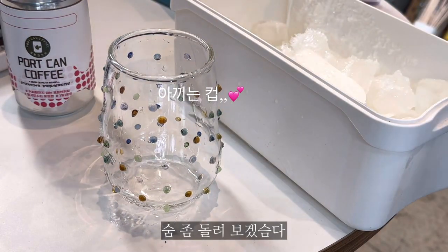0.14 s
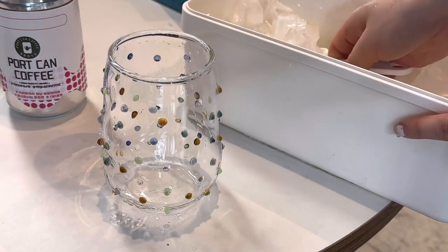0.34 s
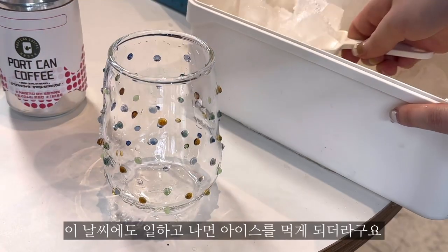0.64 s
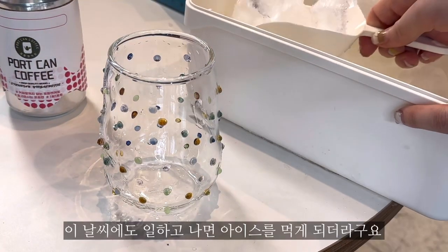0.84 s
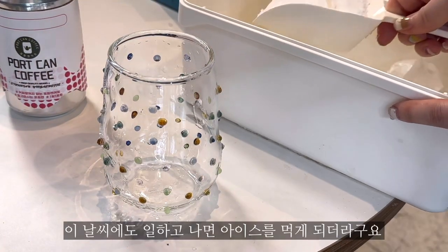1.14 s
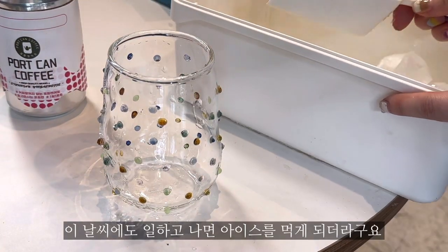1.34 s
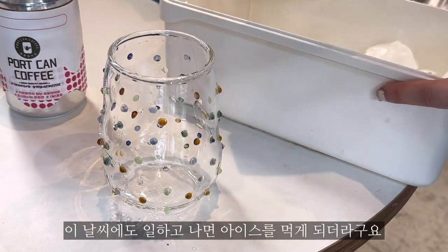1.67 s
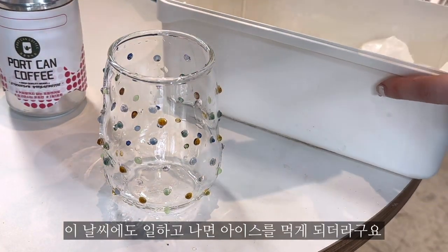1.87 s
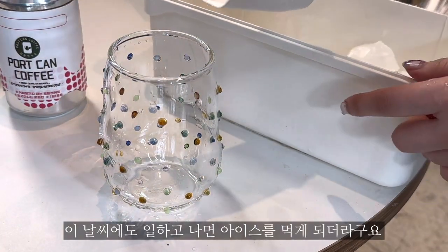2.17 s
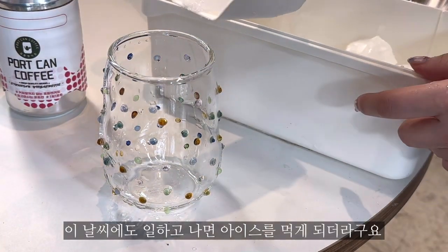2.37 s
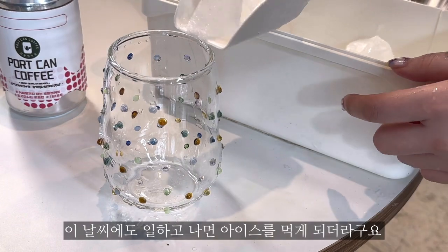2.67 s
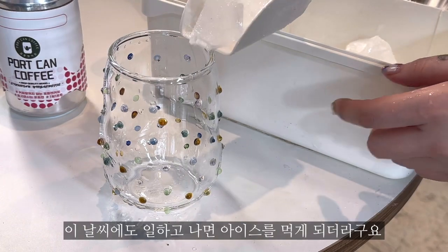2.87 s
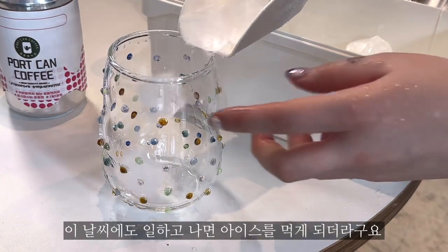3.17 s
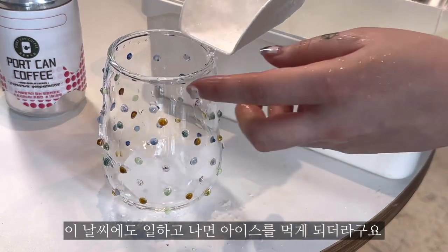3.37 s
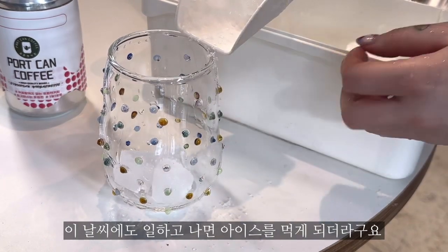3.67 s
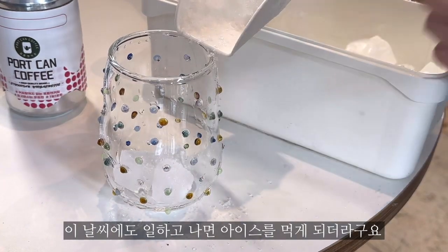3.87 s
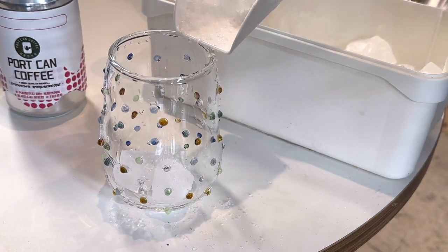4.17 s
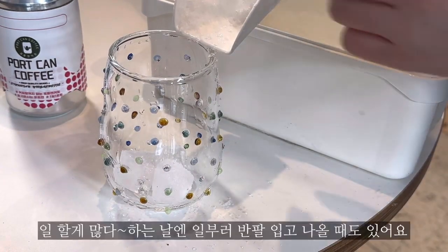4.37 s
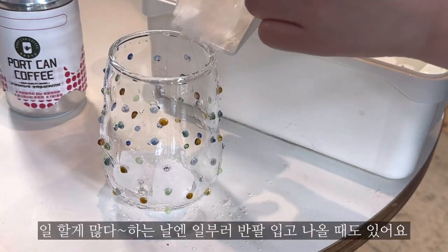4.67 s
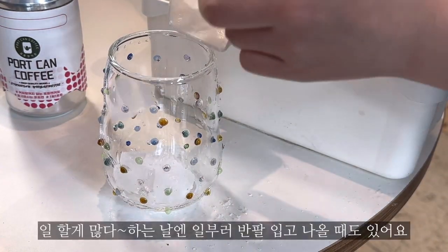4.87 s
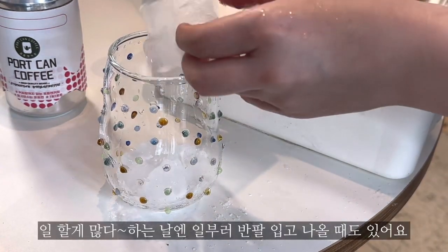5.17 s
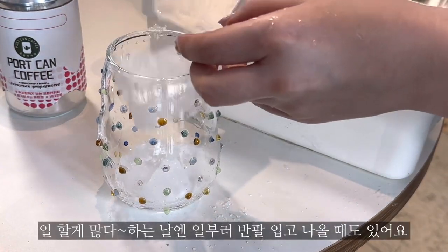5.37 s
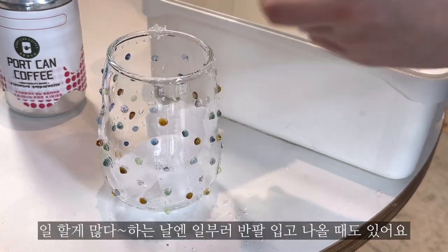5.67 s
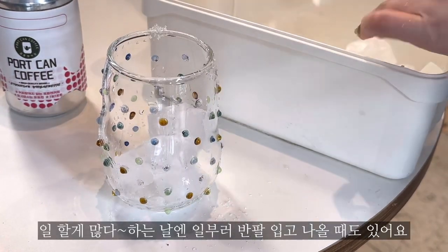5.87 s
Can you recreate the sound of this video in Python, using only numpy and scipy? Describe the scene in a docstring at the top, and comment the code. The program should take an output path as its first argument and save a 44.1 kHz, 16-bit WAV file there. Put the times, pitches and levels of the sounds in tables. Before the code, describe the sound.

In a small quiet room with a low rumble, a scoop digs through ice in a plastic box, crunching and knocking with hollow plastic clacks. After a near-silent pause, cubes slip with dry ticks and clatter brightly into a thin glass on a table. Another pause, then a second tipping clinks more, muffled slightly by ice already there. Close stereo microphones.

```python
"""Ice cubes are dug out of a plastic box with a plastic scoop and tipped, in two goes, into a thin glass tumbler.
Box, scoop, glass and table ring as sums of decaying modes; ice crunches and grinds as coloured noise and clicks.
The air in the glass sounds a short tone at each landing, and the cubes chatter on the wall as they pour.
Small quiet room: low rumble, steady hum, short diffuse reflections. Close pair of microphone ports."""
import sys
import numpy as np
from scipy import signal
from scipy.fft import rfft, irfft, next_fast_len
from scipy.io import wavfile
from scipy.ndimage import uniform_filter1d

SR = 44100
rng = np.random.default_rng(int(sys.argv[2]) if len(sys.argv) > 2 else 0)


def write(x):
    x = np.atleast_2d(x).T
    wavfile.write(sys.argv[1], SR, np.round(np.clip(x, -1, 1) * 32767).astype(np.int16))

N = 265041
TIME = np.arange(N) / SR
AGE = TIME[:SR // 4]   # time since a contact
ATTACK = SR // 50   # samples over which the level of a contact is counted

# Room rumble, shape of its spectrum: [f/Hz, density/dB]
RUMBLE_SPECTRUM = [(15, -38.5), (25, -20.5), (59, -5.5), (108, -20.5), (127, -19.5), (180, -20),
                   (242, -24.5), (344, -27), (439, -38.5), (936, -41), (1040, -33), (1190, -37),
                   (9840, -63.5), (16000, -63.5)]
# Steady hum of the room: [f/Hz, level/dB rms]
HUM_TONES = [(59.2, -67), (177.6, -73.5), (1077, -77)]
# Reverberation of the room: [f/Hz, t60/s]
REVERB_TIMES = [(100, 0.82), (700, 0.31), (3000, 0.19), (8000, 0.043), (16000, 0.12)]
# Phase by which the left port leads: [f/Hz, phase/rad]
LEFT_LEAD = [(100, 0), (350, -.2), (520, .45), (750, .15), (1100, -.15), (1600, 0), (2600, 0), (3900, .3),
             (5000, 0), (6600, .05), (7300, .9), (7900, 2.95), (8600, 3.05), (9250, 1.2), (10300, .7),
             (11300, 0), (12800, -.1), (15800, -2.2)]
# Left port minus right port: [f/Hz, level/dB]
LEFT_EXCESS = [(60, .5), (250, 1), (430, -2.5), (700, 5), (860, 1.5), (1030, 3), (1400, 0)]

# Ice knocking in the box: [t/s, strength/dB, sharpness/dB (0 ordinary, above a hard corner, below a dull bump)]
KNOCKS_IN_BOX = [(.05, -55, -4), (.252, -51, -5), (.332, -46, -4), (.352, -46, -3), (.387, -35, 1),
                 (.392, -29, 1), (.414, -36, -9), (.431, -27, -6), (.45, -38, -3), (.509, -41, 0),
                 (.585, -43, 0), (.616, -42, 0), (.663, -35, -7), (.682, -35, 6), (.72, -29, 0),
                 (.726, -31, -3), (.749, -28, -3), (.768, -26, 0), (.786, -30, 0), (.793, -28, 5),
                 (.831, -32, -4), (.856, -25, 4), (.862, -28, 0), (.881, -30, 2), (.895, -31, 0),
                 (.962, -23, 3), (.974, -26, -1), (.984, -22, -4), (1.015, -26, -2), (1.023, -29, 3),
                 (1.044, -27, 2), (1.055, -26, -1), (1.072, -27, 1), (1.109, -29, -1), (1.12, -31, -2),
                 (1.152, -29, 4), (1.185, -41, -4), (1.215, -39, 3), (1.265, -43, 2), (1.325, -43, -4),
                 (1.796, -51, 0), (2.011, -42, 2), (2.031, -37, -7), (2.045, -36, -9), (2.105, -52, -4),
                 (2.232, -58, 0), (2.472, -56, -2), (5.937, -55, 2)]
# Plastic walls of the box: [f/Hz, level/dB, t60/s]
BOX_WALL_MODES = [(108, -28.5, 0.33), (174, -20.5, 0.12), (295, -22, 0.13), (404, -4.5, 0.089),
                  (503, -2, 0.041), (675.6, -6, 0.08), (760, 5.5, 0.035), (832, -5, 0.025),
                  (897, 0.5, 0.05), (990, 7, 0.023), (1264, -4, 0.039), (1310, -9, 0.045)]
# How hard the cubes grind in the box, one curve per stroke: [t/s, level/dB]
DIGGING_STROKES = [
    [(0.25, -70), (0.316, -57), (0.442, -49.5), (0.54, -48.5), (0.728, -37), (0.888, -43), (0.962, -34),
     (1.13, -41), (1.306, -53), (1.372, -63), (1.644, -60.5), (1.83, -62)],
    [(1.95, -69), (2.02, -49.5), (2.186, -73.5), (2.284, -62), (2.44, -68.5)],
]
# How hard the cubes grind while pouring, one curve per go: [t/s, level/dB]
POURING_STROKES = [
    [(2.88, -60.5), (2.958, -55), (3.194, -41), (3.254, -45), (3.344, -53), (3.442, -49.5), (3.506, -47.5),
     (3.652, -71), (3.72, -64)],
    [(4.6, -78), (4.658, -71.5), (4.79, -49.5), (4.886, -45), (5.102, -51.5), (5.298, -65.5), (5.426, -50),
     (5.47, -48.5), (5.642, -57), (5.72, -67.5)],
]
# The box rocks and bumps on the table: [t/s, level/dB]
BUMPS_ON_TABLE = [(.806, -35), (0.986, -41), (1.16, -41.5), (2.017, -49.5)]
# Box and table in a bump: [f/Hz, level/dB, t60/s]
BOX_BUMP_MODES = [(108, 7, 0.13), (152.3, -1, .08)]
# Ice slipping in the scoop: [t/s, strength/dB, sharpness/dB]
TICKS_IN_SCOOP = [(2.781, -44.5, -5.5), (2.833, -57.5, -12), (2.89, -44, -7.5), (2.906, -55, 2),
                  (2.936, -55, 2.5), (3.025, -31, -8), (3.043, -45.5, 1.5), (3.056, -48, -5),
                  (3.071, -35, -1.5), (3.084, -37, 4.5), (3.096, -37.5, 4), (3.657, -39.5, -10),
                  (3.707, -58, -30), (4.099, -52.5, -8.5), (4.594, -71, 12.5), (4.628, -43.5, -2),
                  (4.645, -40, 1.5), (4.662, -48.5, -2.5), (4.722, -52.5, 4), (5.014, -49, 11),
                  (5.066, -46.5, 5), (5.111, -54, 0.5), (5.19, -55.5, 6), (5.215, -70, 4)]
# Scoop over the mouth of the tumbler: [f/Hz, level/dB, t60/s]
SCOOP_BODY_MODES = [(352, -23.5, .03), (608, 6, 0.13), (850, 10, 0.016), (970, -1, 0.072),
                    (1144, 12.5, 0.035)]

# Cubes striking the tumbler: [t/s, strength/dB, landing/dB (weight passed to the bottom),
# ring/dB (how freely the wall swings), spot/1 (below 0 favours the second wall mode, above 0 the first)]
STRIKES_ON_GLASS = [(3.176, -37, -19.5, -10.5, 0.33), (3.206, -33, 6.5, -11, 0.29),
                    (3.251, -32, -3, -13, -0.0096), (3.267, -27.5, -0.5, -11.5, 0.31),
                    (3.272, -32.5, -4, -11.5, 0.45), (3.286, -45.5, 1.5, -12.5, -0.46),
                    (3.345, -44, 4, -18, 0.48), (3.37, -36, -13, -15, -.2), (3.38, -49.5, 6, -1, -0.25),
                    (3.392, -31, 5.5, -10, 0.49), (3.399, -37.5, 5, -18, 0.95), (3.445, -50, 2, 9, 0.022),
                    (4.78, -50.5, 5, 1.5, 0.53), (4.815, -42, -2.5, -9, -0.78),
                    (4.845, -43, -9, 6.5, -0.0022), (4.861, -41.5, -13, 11, 0.03),
                    (4.896, -39, -17, -10, -0.55), (4.911, -33, -20, 5, 0.34),
                    (4.946, -33.5, -13, -12.5, -0.85), (4.966, -31, 1.5, -10, 0),
                    (4.986, -36.5, -2, -24, -0.35), (5.236, -45, 13, -2, 0.7), (5.266, -41.5, -5, -8.5, 0),
                    (5.284, -39, -14, -0.5, -0.096), (5.294, -35.5, -21, -5.5, -0.42),
                    (5.31, -50, -1.5, -16.5, 0.76), (5.324, -35, -11.5, -7, .6),
                    (5.328, -36.5, 4.5, -14.5, -0.13), (5.403, -53, -34, 2, 0.27),
                    (5.43, -46, -6.5, -2, 0.25), (5.451, -39.5, -15, 1.5, 0.48),
                    (5.454, -28.5, 4, -3, 0.15), (5.466, -38.5, -6, -5.5, -0.43),
                    (5.478, -33.5, -1.5, -12, 0.017), (5.506, -38, -4.5, 3, -0.11),
                    (5.562, -42.5, -9, -4.5, -0.45)]
# A landed cube rocks on the bottom, first touch: [t/s, strength/dB]
ROCKING_CUBES = [(3.474, -52.5), (3.536, -51.5), (4.764, -62), (5.04, -55.5), (5.124, -57.5), (5.6, -71)]
# Tumbler wall, first mode, split by the uneven glass: [f/Hz, level/dB, t60/s]
FIRST_WALL_MODES = [(1621, 0, .155), (1640, -11, .09)]
# Tumbler wall, second mode, likewise split: [f/Hz, level/dB, t60/s]
SECOND_WALL_MODES = [(3908, -10, .14), (4000, 0, .14)]
# Tumbler wall, upper modes: [f/Hz, level/dB, t60/s]
UPPER_WALL_MODES = [(2190, -10, .05), (2660, -9, .07), (5665, -9, .1), (5872, -5, .12), (6953, 0, .09),
                    (6999, 0, .09), (7395, 0, .06), (7612, -2, .045)]
# Highest modes, the shimmer of the glass: [f/Hz, level/dB, t60/s]
GLASS_SHIMMER_MODES = [(8950, -3, .04), (9080, 0, .05), (9870, -6, .04), (10138, -1, .075),
                       (10680, -4, .075), (12080, -4, .04), (12970, -6, .055), (13630, -4, .055),
                       (14120, -6, .055), (14720, -5, .045), (15520, -7, .045)]
# Glass bottom on the table top: [f/Hz, level/dB, t60/s]
GLASS_ON_TABLE_MODES = [(108.4, -24, 0.54), (191, -16, 0.065), (329, -8, 0.065), (426, -12, 0.022),
                        (767, 0, 0.031), (910, -19.5, 0.0049), (977.5, -1, .045), (1170, -6.5, 0.012),
                        (1360, 5, 0.01)]
# Air in the tumbler, lower while ice and scoop cover the mouth: [t/s, f/Hz]
AIR_RESONANCE = [(3.206, 579.5), (3.345, 627), (3.4, 629), (4.85, 617), (4.97, 657), (5.236, 587),
                 (5.327, 538), (5.454, 650.4), (5.6, 667)]
# Start and end of the ice piling up in the glass: [t/s]
FILLING_SPAN = (3.4, 4.9)

# Colour of the clack of ice and plastic: [f/Hz, density/dB]
CLACK_SPECTRUM = [(300, -15), (900, -10), (1600, 6.5), (2300, 0), (3400, -5), (5000, -20), (9000, -41.5)]
# Colour of the crack of ice: [f/Hz, density/dB]
CRACK_SPECTRUM = [(1500, -36.5), (3500, 1.5), (5000, 3), (7500, 3.5), (10300, 6), (11600, -1.5),
                  (15500, -4.5)]
# Colour of ice crunching on glass: [f/Hz, density/dB]
ICE_ON_GLASS_SPECTRUM = [(200, 6.5), (900, 0.5), (2200, 10), (3200, -0.5), (5000, -1.5), (7500, 4),
                         (10500, -9), (11500, -8), (15500, -15)]
# Colour of ice rubbing along plastic: [f/Hz, density/dB]
RUB_SPECTRUM = [(100, -31), (250, -7.5), (450, -9), (850, -1), (1400, -15), (2400, -16.5), (4000, -26),
                (8000, -31)]

BODY_YIELDS = .25   # share of the sharpness that is lost to the body
CLACK_FOLLOWS = 0.1   # share of the sharpness that reaches the clack
# knocks stirred up by digging, levels relative to that of the grinding
SMALL_KNOCKS_PER_S, SMALL_KNOCK_DB, SMALL_KNOCK_SPREAD_DB = 35, -6.5, 6.5
FITS_PER_S, FITS_DB = 33, 1   # cubes catch and slip, so the grinding comes in fits
ROCK_PERIOD_S, ROCK_LOSS_DB = 0.042, 7.5   # from touch to touch
ROCK_LANDING_DB, ROCK_RING_DB = 9, -8.5
SPOT_DB = 15   # how far the spot tips the balance of the two wall modes
# away from a hard landing the air follows only this share of the change in the thud
HARD_LANDING_DB, AIR_FOLLOWS = -24.5, 0.71
FILL_DAMPS_DB, FILL_CUSHIONS_DB = 5.5, 1.5   # lying ice stills the high modes and softens the thud
CHOKE_DB, CHOKE_S = 5.5, .004   # a new contact takes this much off earlier rings, within this time
GLANCE_SPARKLES = 0.23   # share of the landing lost to the high modes: a glancing cube sparkles most


def from_db(db):
    """Amplitude ratio of a level."""
    return 10 ** (np.asarray(db) / 20)


def rms_one(x):
    """Scale to unit rms."""
    return x / np.sqrt(np.mean(x ** 2) + 1e-20)


def at_hz(points, hz):
    """A short table read on a log-frequency axis."""
    knots, values = np.transpose(points)
    return np.interp(np.log(np.maximum(hz, 1)), np.log(knots), values)


def coloured(x, spectrum, tint_db=0):
    """Causal (minimum-phase) filter with the given spectrum; tint gives each row broad humps of its own."""
    size = 2 * next_fast_len(x.shape[-1] // 2 + SR // 20)
    hz = np.fft.rfftfreq(size, 1 / SR)
    db = at_hz(spectrum, hz)
    if tint_db:
        knots = np.geomspace(700, 16000, 20)
        humps = rng.uniform(-1, 1, (len(x), len(knots)))
        db = db + tint_db * np.array([np.interp(hz, knots, row) for row in humps])
    # folding the cepstrum onto positive time makes the phase minimal
    cepstrum = irfft(np.log(from_db(db)))
    cepstrum[..., 1:size // 2] *= 2
    cepstrum[..., size // 2 + 1:] = 0
    response = np.exp(rfft(cepstrum))
    return irfft(rfft(x, size) * response)[..., :x.shape[-1]]


def add(track, times, levels_db, sounds):
    """Lay one sound per contact into the track, each at its own attack level."""
    for s, db, sound in zip(times, levels_db, sounds):
        start = max(int(s * SR), 0)
        gain = from_db(db) / np.sqrt(np.mean(sound[:ATTACK] ** 2) + 1e-20)
        part = track[start:start + len(sound)]
        part += gain * sound[:len(part)]


def ringing(modes, count, scatter_db, detune):
    """Each contact finds other mode strengths and phases; the load of ice shifts and damps the modes."""
    age = AGE.astype(np.float32)
    out = np.zeros((count, len(age)), np.float32)
    for hz, db, t60 in modes:
        draws = rng.uniform(-1, 1, (count, 4)).astype(np.float32)
        strength, phase, shift, load = draws.T[:, :, None]
        wave = np.sin(np.float32(2 * np.pi * hz) * (1 + detune * shift) * age + np.pi * phase)
        rate = np.float32(np.log(1000) / t60) * np.exp(0.23 * load)
        decay = np.exp(-np.minimum(rate * age, 20))
        rise = 1 - np.exp(-age / np.float32(0.00009 + 0.19 / hz))   # builds up while the contact lasts
        out += from_db(db + scatter_db * strength) * wave * decay * rise
    return out


def crunch(spectrum, count, snap_s, crumble_s, crumble_db):
    """A contact crushes the ice surface: a sharp snap, then a few crumbs; every cube has its own colour."""
    age = AGE[:SR // 12]
    snap, crumbs, sizes = rng.standard_normal((count, 3, len(age))).transpose(1, 0, 2)
    snapping = snap * np.exp(-age / snap_s)
    crumbling = from_db(crumble_db) * crumbs * sizes ** 2 * np.exp(-age / crumble_s)
    onset = 1 - np.exp(-age / .0005)
    return coloured((snapping + crumbling) * onset, spectrum, tint_db=5)


def background(side_db):
    """Low rumble of the room, nearly alike at both ports, with a faint steady hum."""
    mid, side = rms_one(coloured(rng.standard_normal((2, N)), RUMBLE_SPECTRUM))
    hum = np.zeros(N)
    for hz, db in HUM_TONES:
        hum += np.sqrt(2) * from_db(db) * np.sin(2 * np.pi * (hz * TIME + rng.random()))
    rumble = mid + from_db(side_db) * side * [[1], [-1]]
    return from_db(-58.5) * rumble + hum


def effort(strokes):
    """Gain of the grinding over time; silent between the strokes."""
    out = np.zeros(N)
    for stroke in strokes:
        s, db = np.transpose(stroke)
        moving = uniform_filter1d(((TIME > s[0]) & (TIME < s[-1])) * 1., SR // 100)
        out += np.maximum(moving, 0) * from_db(np.interp(TIME, s, db))
    return out


def small_knocks():
    """Digging jogs other cubes at random moments: rows like those of the loud knocks."""
    chance, when, size, edge = rng.random((400, 4)).T
    start, end = DIGGING_STROKES[0][0][0], DIGGING_STROKES[-1][-1][0]
    s = start + when * (end - start)
    grinding_db = 20 * np.log10(effort(DIGGING_STROKES)[(s * SR).astype(int)] + 1e-9)
    db = grinding_db + SMALL_KNOCK_DB + SMALL_KNOCK_SPREAD_DB * (2 * size - 1)
    sharp = SMALL_KNOCK_SPREAD_DB * (2 * edge - 1)
    kept = chance < SMALL_KNOCKS_PER_S * (end - start) / len(s)
    return np.column_stack([s, db, sharp])[kept]


def box(body_db, clack_db, crack_db):
    """Cubes and scoop knock and set the plastic walls booming; a sharp knock cracks more and booms less."""
    s, db, sharp = np.vstack([KNOCKS_IN_BOX, small_knocks()]).T
    out, count = np.zeros(N), len(s)
    body = ringing(BOX_WALL_MODES, count, scatter_db=8.5, detune=0.099)
    clack = crunch(CLACK_SPECTRUM, count, snap_s=0.00087, crumble_s=0.0091, crumble_db=-18)
    crack = crunch(CRACK_SPECTRUM, count, snap_s=0.001, crumble_s=0.012, crumble_db=-18)
    add(out, s, db + body_db - BODY_YIELDS * sharp, body)
    add(out, s, db + clack_db + CLACK_FOLLOWS * sharp, clack)
    add(out, s, db + crack_db + sharp, crack)
    return out


def slips(per_s, spread_db):
    """Stick and slip: tiny clicks of random size at random moments."""
    spread = from_db(spread_db * np.minimum(rng.exponential(1, N), 4))
    sizes = spread * rng.standard_normal(N)
    return sizes * (rng.random(N) < per_s / SR)


def fits():
    """A gain that wanders about at random as the cubes catch and slip."""
    knots = np.clip(rng.standard_normal(2000), -2, 2)
    return from_db(FITS_DB * np.interp(TIME * FITS_PER_S, np.arange(len(knots)), knots))


def sliding():
    """Frosty cubes grind along the plastic; while pouring they also chatter against the glass."""
    rub = rms_one(coloured(slips(per_s=2500, spread_db=-2.0), RUB_SPECTRUM))
    jostle = rms_one(coloured(slips(per_s=340, spread_db=-1.0), CLACK_SPECTRUM))
    grit = rms_one(coloured(slips(per_s=850, spread_db=-1.0), CRACK_SPECTRUM))
    wall_modes = FIRST_WALL_MODES + SECOND_WALL_MODES + UPPER_WALL_MODES
    # four spots on the wall, each with its own balance of modes
    wall = ringing(wall_modes, count=4, scatter_db=22.5, detune=0.004)
    chatter = np.zeros(N)
    for spot in wall:
        chatter += signal.fftconvolve(slips(per_s=60, spread_db=-0.5), spot)[:N]
    chatter = rms_one(chatter)
    in_box = rub + from_db(-6) * jostle + from_db(-8) * grit
    at_glass = from_db(-8) * rub + from_db(-8) * jostle + from_db(-5.5) * grit + from_db(-7.5) * chatter
    return fits() * (effort(DIGGING_STROKES) * in_box + effort(POURING_STROKES) * at_glass)


def bumps():
    """At a few listed moments the whole box thumps on the table: two low modes."""
    s, db = np.transpose(BUMPS_ON_TABLE)
    out = np.zeros(N)
    add(out, s, db, ringing(BOX_BUMP_MODES, count=len(s), scatter_db=2, detune=0.072))
    return out


def scoop(body_db, clack_db, crack_db):
    """Cubes tip over in the small stiff scoop with dry ticks."""
    s, db, sharp = np.transpose(TICKS_IN_SCOOP)
    out, count = np.zeros(N), len(s)
    clack = crunch(CLACK_SPECTRUM, count, snap_s=.0016, crumble_s=.008, crumble_db=-26)
    body = ringing(SCOOP_BODY_MODES, count, scatter_db=3, detune=0.099)
    crack = crunch(CRACK_SPECTRUM, count, snap_s=0.0004, crumble_s=0.016, crumble_db=-26.5)
    add(out, s, db + body_db - BODY_YIELDS * sharp, body)
    add(out, s, db + clack_db, clack)
    add(out, s, db + crack_db + sharp, crack)
    return out


def rocking(count):
    """A rocking cube touches the bottom ever more softly: rows like those of the strikes."""
    rows = []
    for s, db in ROCKING_CUBES:
        for k in range(count):
            rows.append((s + k * ROCK_PERIOD_S, db - k * ROCK_LOSS_DB, ROCK_LANDING_DB, ROCK_RING_DB, 0))
    return rows


def choking(times):
    """Gain of each ring over its age: later cubes that meet the wall damp it."""
    later = np.zeros((len(times), len(AGE)))
    for row, s in zip(later, times):
        for gap in times[(times > s + CHOKE_S) & (times < s + AGE[-1])] - s:
            row += np.clip((AGE - gap) / CHOKE_S, 0, 1)
    return from_db(-CHOKE_DB * later)


def air_tone(times):
    """The air in the glass sounds a short decaying tone at the pitch of the moment."""
    t60, rise_s = .06, .002
    hz = np.interp(times, *np.transpose(AIR_RESONANCE))
    wave = np.sin(2 * np.pi * hz[:, None] * AGE)
    return wave * from_db(-60 * AGE / t60) * (1 - np.exp(-AGE / rise_s))


def tumbler(crack_db, air_db, upper_db, shimmer_db):
    """A glancing cube rings the wall; a landing one thuds on the table and sounds the air in the glass."""
    s, db, landing, ring, spot = np.vstack([STRIKES_ON_GLASS, rocking(count=3)]).T
    out, count = np.zeros(N), len(s)
    thud = ringing(GLASS_ON_TABLE_MODES, count, scatter_db=4, detune=.08)
    first = ringing(FIRST_WALL_MODES, count, scatter_db=3, detune=.002)
    second = ringing(SECOND_WALL_MODES, count, scatter_db=5, detune=.0015)
    upper = ringing(UPPER_WALL_MODES, count, scatter_db=7, detune=.005)
    shimmer = ringing(GLASS_SHIMMER_MODES, count, scatter_db=9, detune=.006)
    crack = crunch(ICE_ON_GLASS_SPECTRUM, count, snap_s=0.0018, crumble_s=0.014, crumble_db=-18.5)
    filled = np.interp(s, FILLING_SPAN, [0, 1])
    free = choking(s)
    sparkle = db - GLANCE_SPARKLES * landing - FILL_DAMPS_DB * filled
    add(out, s, db + landing - FILL_CUSHIONS_DB * filled, thud)
    add(out, s, db + crack_db, crack)
    add(out, s, air_db + AIR_FOLLOWS * (db + landing - HARD_LANDING_DB), air_tone(s))
    add(out, s, db + ring + SPOT_DB * spot, first * free)
    add(out, s, db + ring - SPOT_DB * spot, second * free)
    add(out, s, sparkle + upper_db, upper * free)
    add(out, s, sparkle + shimmer_db, shimmer * free)
    return out


def room(x, wet_db, first_echo_s):
    """Diffuse reflections as decaying noise bands, different at each port, each with its own decay."""
    age, response = TIME[:SR * 2 // 3], 0
    edges = np.geomspace(80, 17000, 9)
    for low, high in zip(edges, edges[1:]):
        bandpass = signal.butter(2, [low, high], "band", fs=SR, output="sos")
        band = signal.sosfilt(bandpass, rng.standard_normal((3, len(age))))
        # long waves reach both ports more alike
        apart = np.clip(high / 5000, .5, 1)
        pair = np.sqrt(1 - apart ** 2) * band[0] + apart * band[1:]
        t60 = at_hz(REVERB_TIMES, np.sqrt(low * high))
        response = response + pair * from_db(-60 * age / t60)
    response = rms_one(response * (age > first_echo_s)) / np.sqrt(len(age))
    return from_db(wet_db) * signal.fftconvolve(x[None], response, axes=1)[:, :N]


def ports(pair):
    """The two ports differ in level in the low mids and in phase, most of all in the treble."""
    size = 2 * next_fast_len(N // 2 + SR // 10)
    hz = np.fft.rfftfreq(size, 1 / SR)
    # each port takes half of the difference
    half = from_db(at_hz(LEFT_EXCESS, hz) / 2) * np.exp(.5j * at_hz(LEFT_LEAD, hz))
    return irfft(rfft(pair, size) * np.array([half, 1 / half]))[:, :N]


def scene():
    """All the ice sounds close by, in the room; nothing of it reaches below about 75 Hz."""
    ice = box(body_db=-0.87, clack_db=-6.5, crack_db=-10.5)
    ice += sliding() + bumps()
    ice += scoop(body_db=-3.5, clack_db=1.5, crack_db=0)
    ice += tumbler(crack_db=-2.5, air_db=-25, upper_db=0.5, shimmer_db=-0.5)
    ice = signal.sosfilt(signal.butter(2, 75, "high", fs=SR, output="sos"), ice)
    reflections = room(ice, wet_db=-15.0, first_echo_s=0.00067)
    return ports(ice + reflections) + background(side_db=-15.0)


def record(dry):
    """The sound drops out briefly near the start; a steep low-pass cuts the top above 15.9 kHz."""
    live = np.interp(TIME, [.125, .15, .235, .25], [1, 0, 0, 1])
    lowpass = signal.ellip(10, .1, 80, 15900, fs=SR, output="sos")
    return signal.sosfilt(lowpass, dry * live)


dry = scene()
out = record(dry)
write(out)
```